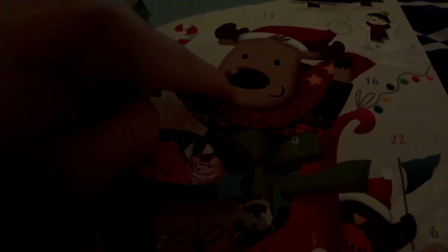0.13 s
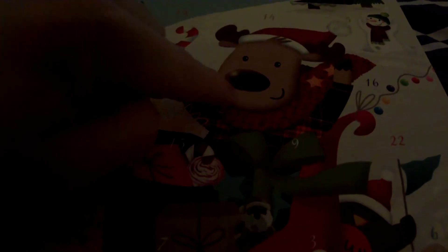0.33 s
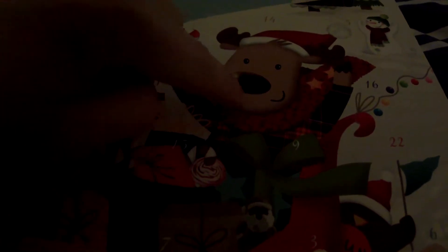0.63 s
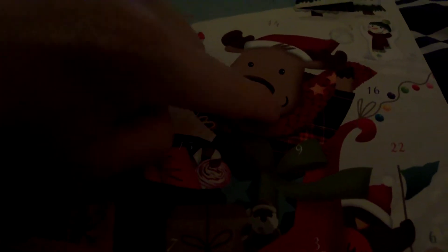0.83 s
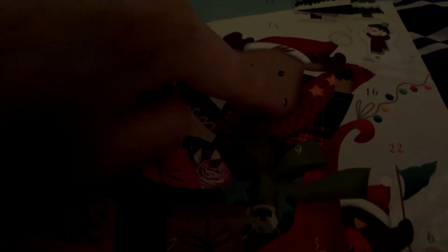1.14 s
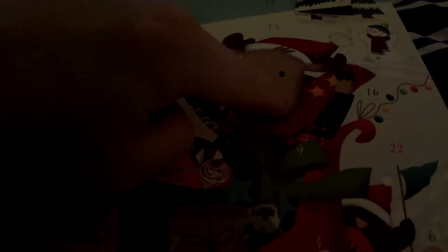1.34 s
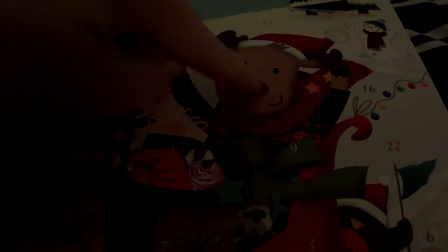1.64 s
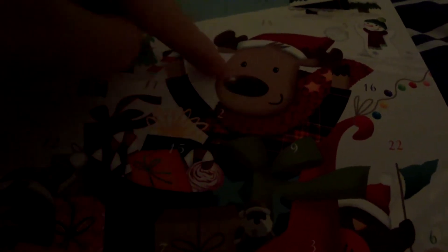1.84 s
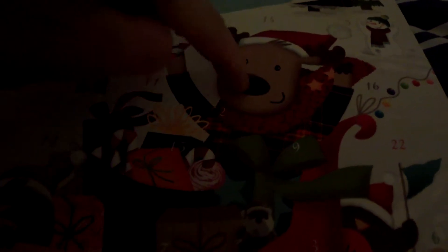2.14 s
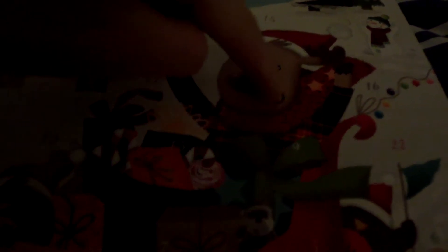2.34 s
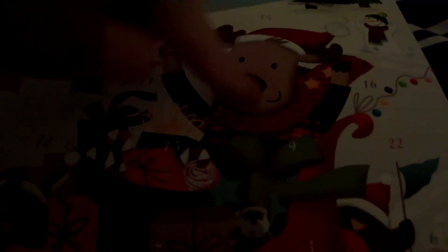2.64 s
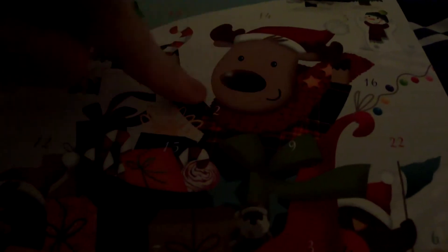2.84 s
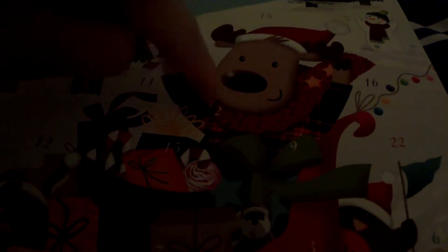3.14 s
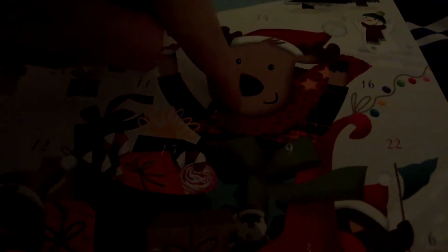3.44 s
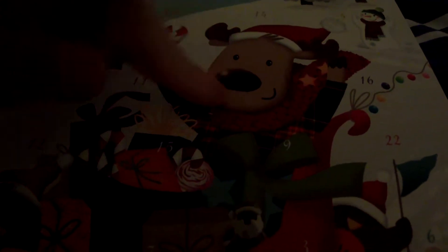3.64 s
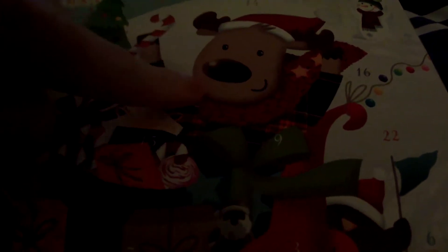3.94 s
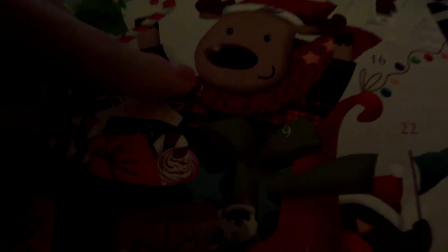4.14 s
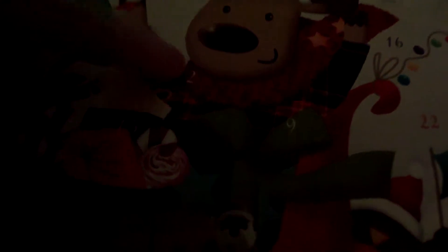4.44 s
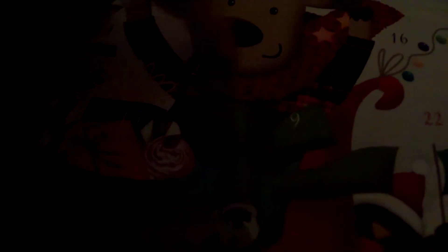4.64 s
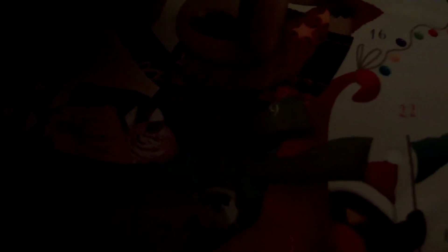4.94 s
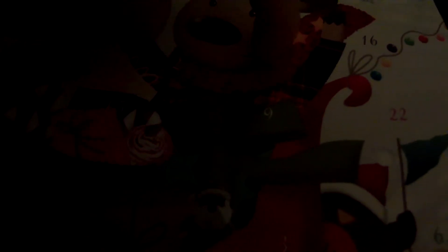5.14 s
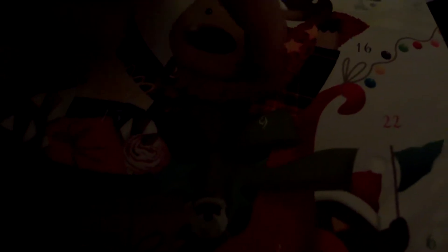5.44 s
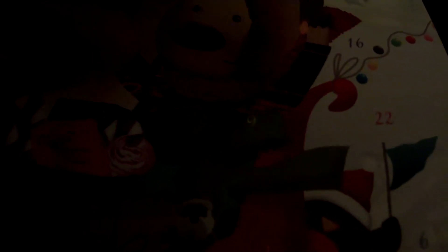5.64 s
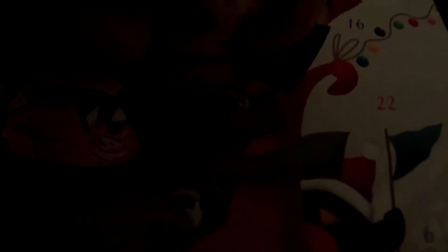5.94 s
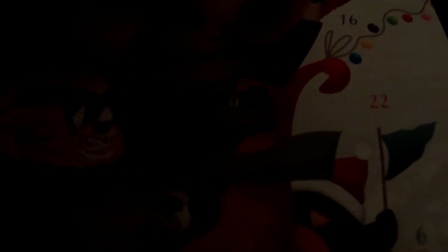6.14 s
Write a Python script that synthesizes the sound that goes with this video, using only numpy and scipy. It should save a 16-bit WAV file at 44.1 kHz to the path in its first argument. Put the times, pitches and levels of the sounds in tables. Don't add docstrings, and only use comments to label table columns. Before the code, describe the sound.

Very close to a hand-held camera microphone in a quiet room, fingernails feel along a cardboard edge with small dry clicks and rubbing. They pick at a flap, pressing the hollow box with soft low thumps, then tear it with several loud cracks. A quieter pause with faint ticks follows, then denser crinkling as the card is lifted and pulled back. Low rumble and hiss continue throughout.

```python
import sys
import numpy as np
from scipy import signal
from scipy.io import wavfile
from scipy.ndimage import uniform_filter1d

SR = 44100
rng = np.random.default_rng(int(sys.argv[2]) if len(sys.argv) > 2 else 0)


def volts(x):
    e = np.asarray(x, float) / 20
    return 10 ** e


def generate_wav(sig):
    pcm = np.round(np.clip(np.atleast_2d(sig).T, -1, 1) * 32767).astype(np.int16)
    wavfile.write(sys.argv[1], SR, pcm)


N = 276815
HZ = np.fft.rfftfreq(4096, 1 / SR)

# crest
# t/s, panel level/dB, crisp edge against panel/dB, fall by 8 dB/ms, ring f/Hz
BURSTS = [(0.0452, -41, -3.5, 3, 1800), (0.0576, -49.5, -1, 8, 1780), (0.0777, -47, 4.5, 8, 1980),
          (0.1052, -51, -5.5, 7, 1970), (0.1454, -50.5, 1, 15, 2730), (0.1744, -49, -7, 7, 760),
          (0.1993, -51, 8, 0, 3610), (0.2068, -37.5, -3, 0, 1210), (0.2218, -40, -1.5, 14, 1850),
          (0.2425, -44, 2, 4, 1750), (0.2612, -51, 8, 7, 3180), (0.273, -44.5, -6, 12, 1740),
          (0.2915, -38, -13.0, 2, 2020), (0.3206, -44, 8, 9.5, 2030), (0.3468, -45, -2, 18, 3610),
          (0.002, -43.5, -8, 3, 700), (0.3955, -44.0, -5.0, 3, 2770),
          (0.4385, -38.5, -10, 2.5, 1530), (0.4635, -43.5, -3, 3, 2530), (0.472, -44, -1, 6, 1680),
          (0.5552, -34, 0.5, 3, 2700), (0.5701, -42, -21, 3.5, 1450), (0.597, -48, -1, 6.5, 1270),
          (0.5495, -42.5, 0, 3, 1310), (0.6217, -50.5, 6, 2.5, 3340), (0.686, -47, -17, 3.5, 845),
          (0.7508, -58, -11, 5, 2000), (0.7694, -48, -13, 3, 2210), (0.7961, -47.5, 3, 8, 2780),
          (0.8102, -38.5, -18, 3, 1680), (0.8238, -38, -13, 1, 610), (0.8333, -53, 11.5, -4, 2060),
          (0.8489, -45, -9, 10.5, 1260), (0.8773, -42, -5, 2.5, 905), (0.9063, -37.5, 5, 5.5, 3150),
          (0.9254, -43.5, -5, 11, 1770), (0.9373, -45, -2, -7, 1670),
          (0.9516, -25.5, -12, 1.5, 1940), (0.9783, -43, -3, 1.5, 860),
          (0.998, -38, -8, 3.7, 2070), (1.012, -48, -11, 4, 1670), (1.02, -42, -2, 3.8, 1390),
                 (1.0487, -43, 0.5, 7.8, 2000), (1.0958, -37, -0.5, 10, 660), (1.119, -50, -13, 3.4, 2080),
                 (1.1282, -30, -5, 5.3, 2010), (1.168, -47, 0, 3.6, 2000), (1.176, -44, -3, 2.7, 2100),
                 (1.202, -45, 0.5, 2.6, 2100), (1.247, -43, 6.5, 2.8, 2730), (1.2807, -43, -8, 5.1, 680),
                 (1.289, -42.5, -2.5, 3.2, 600), (1.2964, -49, -5, 4.4, 3110), (1.37, -33, -5.5, 2.9, 2490),
                 (1.453, -35.5, -5, 4, 594), (1.4603, -37.5, 2, 4.2, 1730), (1.6573, -48.5, -23, 5.2, 2030),
                 (1.683, -45.5, 7.5, 3.5, 2040), (1.709, -36, 1, 6.2, 2220), (1.7625, -34, -0.5, 2.9, 3080),
                 (1.7773, -41, 1.5, 12, 1650), (1.83, -46.5, 0, 7.2, 2100), (1.879, -41, -2, 4.9, 2820),
                 (1.9137, -46.5, -2, 6.2, 1620), (1.9268, -44, 5.5, 6.9, 1800),
                 (1.9615, -52, -11, 8.3, 1950), (2.049, -47.5, 3, 13, 2940), (2.0863, -50, 8, 2.3, 1660),
                 (2.101, -48.5, 1, 11, 1770), (2.117, -45, -1, 5.1, 2060), (2.128, -36, -1, 6.2, 2100),
                 (2.145, -39.5, -4, 7.5, 2930), (2.18, -46, 0.5, 10.6, 2120), (2.247, -43.5, 2, 12, 2700),
                 (2.2878, -39.5, 0, 5.3, 2880), (2.301, -41, -19, 5.2, 800),
                 (2.317, -42.5, 4.5, 10.4, 1840), (2.344, -39, -3, 14.6, 2200),
          (2.3645, -36, 2, 7.2, 1840), (2.384, -40.5, -6, 4.6, 1760), (2.3974, -47, 0, 8.5, 2100),
                  (2.415, -50, 6, 5.5, 3120), (2.448, -48.5, -1, 19, 2090), (2.471, -50.5, 10, 2.5, 1750),
                  (2.4905, -38.5, -3, 5.2, 2100), (2.5808, -40, -4, 7.9, 2270),
                  (2.6512, -36.5, -4, 11, 1900), (2.683, -43.5, 4.5, 1.6, 2150),
                  (2.7085, -48.5, -16, 7.6, 920), (2.73, -37, 0, 3.3, 1580), (2.744, -50, -15, 12, 1050),
                  (2.7744, -45, -9.0, 5.9, 610), (2.807, -44, 0.5, 7, 2080), (2.827, -53, -5.0, 4.7, 1570),
                  (2.847, -49, 2, 3, 810), (2.858, -47.5, 4, 2.2, 845), (2.8674, -44, -4, 5.3, 3570),
                  (2.902, -40, -9, 4.5, 2060), (2.919, -42.5, -6, 6.5, 2060), (2.9828, -41.5, 0, 13, 3550),
                  (3.0157, -42, -16, 30, 2070), (3.0293, -53, -4, 12.3, 2130), (3.0478, -48, 1, 12, 2080),
                  (3.07, -38.5, 4.5, 7.2, 1950), (3.0862, -29, -2, 9.6, 1750), (3.108, -36.5, 3, 5.9, 2060),
                  (3.125, -39.5, -1.0, 9.4, 1800), (3.161, -45.5, 10, 4.3, 2020),
                  (3.1747, -41.5, 5.5, 13, 2040), (3.2022, -21.5, -3.5, 7.4, 2060),
                  (3.2279, -20, -7.5, 6.3, 2100), (3.2467, -29, -3, 8.5, 2060), (3.296, -52, -5, 17, 1610),
                  (3.3303, -46, -0.5, 3.3, 1590), (3.3762, -45, 3, 3.2, 2820),
                  (3.4248, -15.5, -2.5, 6.4, 1850), (3.514, -27.5, 0, 5.9, 650),
          (3.6847, -49, 3.5, 3.9, 1610), (3.7063, -49, -10.5, 3.8, 1740),
                  (3.7215, -48, -10, 5.4, 850), (3.7498, -45, -7, 7.6, 850), (3.8855, -40.5, 1.5, 2, 2900),
                  (3.903, -54, 1, 19, 640), (3.952, -45, -14, 3.3, 1600), (4.164, -51, -10, 6.2, 2130),
                  (4.363, -52, -17, 8, 810), (4.381, -57.5, 14.5, 2.1, 1800), (4.5231, -51, 12, 0.94, 2870),
                  (4.6142, -52.5, -4, 8.3, 1560), (4.6936, -34, -12, 2, 1660), (4.779, -51, -3, 8.8, 1590),
                  (4.8025, -43, 2, 4.9, 2740), (4.8226, -42, 3, 2.1, 2790), (4.8471, -36, -1, 2.7, 3650),
                  (4.864, -41, -6, 2.7, 2690), (4.881, -49.0, 1, 6.8, 1600), (4.95, -54, 12, 3, 4200),
                  (4.967, -46, 0.5, 5.7, 1930), (5.0112, -41.5, -20, 2.1, 880), (5.0348, -35, -7, 3, 1660),
                  (5.049, -51, 4, 5.1, 1570), (5.063, -39.5, -1.5, 4.6, 2760),
                  (5.0724, -44.5, -10, 4.1, 3180), (5.0812, -53, 2, 5.7, 1710), (5.1019, -35, 1, 3.2, 1580),
                  (5.1206, -41, -9, 2.2, 2210), (5.1339, -33.5, -2.0, 2, 3270),
                  (5.147, -44.5, 4, 3.5, 3020), (5.193, -40.5, -3.5, 4.3, 1570),
                  (5.219, -52, -3, 4.3, 1650), (5.235, -40.5, -6.5, 3, 1700), (5.3734, -47.5, -8, 5, 1320),
                  (5.398, -37, -10, 1.7, 2780), (5.4144, -52.5, 14, 9.4, 3660), (5.4353, -40, 3, 7.8, 1810),
                  (5.4468, -35.5, -5, 7.3, 2820),
          (5.4715, -37.5, 2, 2.2, 3000), (5.4788, -35, 5, 2.1, 1570),
                  (5.4907, -35, -3.5, 12.5, 3970), (5.527, -45.5, 3, 8, 2080), (5.534, -43, -4, 9.1, 1590),
                  (5.5636, -36, -2, 4.9, 1700), (5.582, -37, 1, 2.3, 2180), (5.5965, -34, -0.5, 2.1, 1590),
                  (5.6163, -48, 1, 2.9, 2130), (5.626, -37, -7.0, 3.3, 1630),
                  (5.637, -34.5, -19, 1.6, 2850), (5.6511, -35.5, -2, 2.8, 3760),
                  (5.66, -36.5, -1, 5.4, 3700), (5.6818, -46.5, 0, 7.7, 2710),
                  (5.7996, -44.5, 4.5, 11.3, 1730), (5.8247, -43, 6, 5.7, 3220), (5.85, -44, -3, 6.1, 2060),
                  (5.8582, -38, -10, 3.7, 1540), (5.8688, -50, -3.5, 3.9, 1580),
                  (5.8888, -41.5, 1, 2.7, 2050), (5.909, -37.5, -2, 3.9, 2060),
                  (5.9257, -37, -3, 5.8, 2360), (5.9405, -38, -1, 6, 3520), (5.957, -42.5, -3, 11, 1670),
                  (5.967, -41, 2, 5.7, 2220), (5.9807, -34, 2, 1.6, 2210), (5.9937, -30, -6, 1.6, 1940),
                  (6.005, -37, 3.5, 4.1, 2090), (6.0265, -54, -3.5, 3.1, 1690), (6.043, -42, -13, 2, 1580),
                  (6.056, -45.5, -10, 5.3, 2200), (6.0702, -26, -3, 4.3, 1770),
                  (6.128, -39.5, -9.0, 3.5, 1700), (6.135, -35.5, -3.5, 3.3, 2070),
                  (6.1719, -34, 1.5, 3.5, 2920), (6.224, -37.5, -1, 6.9, 1910),
                  (6.2402, -58, -0.5, 8.5, 1730), (6.25, -39, -6, 6.6, 850), (6.2727, -39.5, 2, 2.9, 2110),
          (3.5077, -24, -3, 2.5, 1800),
    (4.017, -59, 4, 3, 2900),
    (4.1455, -61, 7, 3, 3560),
]
RISE_MS, RISE_PER_FALL = 1.13, 0.27
CRACK_DB, CRACK_PACE = -22, 0.4

# start t/s, length/s, pressure level/dB, fine scrape against it/dB
STROKES = [(0.027, 0.095, -52, -7), (0.17, 0.19, -51.5, -6), (0.37, 0.11, -50, -9), (0.58, 0.044, -63, -4),
           (0.669, 0.018, -51, -20), (0.736, 0.026, -51, -16), (0.78, 0.084, -54.5, -9),
           (1.407, 0.011, -49, 1), (0.883, 0.13, -47, -0.5), (1.045, 0.24, -52.5, -4),
           (1.643, 0.15, -47.5, -13), (1.785, 0.23, -55.5, -1.5), (2.086, 0.14, -53.5, -4),
           (2.226, 0.31, -54, 2.5), (2.55, 0.22, -62, 2), (2.81, 0.22, -51, -9), (2.977, 0.22, -53, 8),
           (3.16, 0.13, -39.5, -8), (3.414, 0.15, -44.5, 0.5), (3.651, 0.079, -53, -18),
           (3.883, 0.14, -54, -12), (4.168, 0.071, -56.5, 4.5), (4.232, 0.19, -54.5, -5),
           (4.52, 0.35, -59.5, 8), (4.638, 0.14, -65.5, 14), (5.018, 0.13, -49.5, -9),
           (5.188, 0.073, -52.5, -1), (5.372, 0.18, -50.5, -10), (5.544, 0.19, -67, 10),
           (5.78, 0.16, -55, -10), (5.89, 0.16, -46.5, -17), (6.19, .1, -52, -8)]
LAND_S, LEAVE_S = 0.012, 0.005
EASE = 0.079
RESTING_DB, RESTING_FINE_DB = -61.5, -63.5
SAG_DB = -3

# deepest point t/s, level/dB, width/ms
PUSHES = [(0.07, -27.5, 2.8), (0.1755, -32.5, 3.9), (0.549, -35, 3.7), (0.754, -22, 5.1),
          (0.794, -20.5, 4.9), (0.8233, -23.5, 3.7), (0.849, -23, 1.3), (0.952, -28, 0.99),
          (1.106, -32, 2.8), (1.115, -26, 2.7), (1.1267, -25, 3.4), (1.139, -29, 1.9), (1.159, -31, 2.2),
          (1.178, -28, 1.9), (1.191, -27, 2.3), (1.2, -29, 3.9), (1.217, -29, 4.4), (1.2495, -28, 3.2),
          (1.2824, -17.5, 3.2), (1.4514, -15.5, 2.4), (2.299, -20, 3.4), (3.2885, -24, 13.2),
          (3.4236, -30, 2.4), (3.506, -27, 3.5), (4.672, -29.5, 6.4), (5.2313, -28.5, 7.9),
          (5.8202, -26.5, 0.7), (6.067, -15.5, 1.8)]
# crest t/s, level/dB, width/ms
SLIPS = [
    (3.916, -46, 1.4),
    (3.938, -41, 1.6),
    (3.959, -38, 1.2),
    (3.976, -37, 1.6),
    (3.995, -36.5, 1.9),
    (4.345, -35.5, 0.9),
    (4.36, -31.5, 0.65),
]
# t/s, level/dB, ring f/Hz, fall by 8 dB/ms
KNOCKS = [(0.433, -49.5, 795, 6.5), (5.228, -36, 625, 2), (2.855, -41, 834, 2.5), (2.91, -49, 276, 7),
          (2.976, -42.5, 290, 5), (3.083, -34, 960, 2.5), (3.2, -34.5, 1010, 9), (3.227, -29.5, 1114, 10),
          (3.231, -39, 307, 18), (3.366, -45.5, 834, 5.5), (3.421, -28.5, 320, 1.5), (3.508, -25, 635, 7),
          (3.749, -50, 270, 13), (3.284, -41, 263, 4), (5.097, -54, 620, 8), (3.204, -39, 290, 10),
          (3.422, -39, 940, 1), (5.988, -30, 910, 2), (6.245, -38, 835, 0.5)]

# f/Hz, width/Hz, lift/dB
BOX_MODES = [(620, 165, 4), (880, 50, 4.5), (2820, 900, 6), (3560, 610, 1)]
# f/Hz, level/dB per Hz
CARD_COLOUR = [(250, -0.5), (600, -5), (1300, -4.5), (2200, -6), (4400, -10), (6400, -4.5), (8000, -4),
               (15000, -24.5)]
# low f/Hz, high f/Hz
PANEL_AND_EDGE = [(300, 4700), (4200, 20000)]

# f/Hz, level/dB per Hz
RUMBLE_COLOUR = [(12, 2.5), (40, 4.5), (54, -8.5), (125, -8), (175, -20.5), (300, -20), (700, -34),
                 (1100, -68.5)]
TREMOR_DB = -47.5
# f/Hz, level/dB per Hz
HISS_COLOUR = [(300, -41), (760, 5.5), (1400, -2.5), (2200, -7), (4800, -2.5), (9760, -2.5), (14500, 3.5),
               (15500, -12)]
HISS_DB = -62.5
# f/Hz, width/Hz, lift/dB
MIC_BANDS = [(3270, 1100, 15), (4380, 290, 11.5), (6120, 550, 10.5)]
# f/Hz, level/dB
WHINE = [(14426, -84)]
# f/Hz, width/Hz, lift/dB
CASE_MODES = [(398, 130, -17.5), (1449, 74, -7), (1570, 37, 4), (1700, 145, 6), (1845, 77, -6.5),
              (2060, 103, 5), (2642, 50, -10.5), (7300, 140, 0), (7280, 230, 2.5), (7580, 200, -7),
              (8360, 310, -5), (9050, 270, 7)]


def evened(x):
    return x / np.sqrt(np.mean(x ** 2) + 1e-20)


def lumps(first, second):
    smooth = uniform_filter1d(rng.standard_normal(N), size=first)
    return evened(uniform_filter1d(smooth, size=second))


def read(points, hz):
    f, value = np.transpose(points)
    return np.interp(np.log(hz + 1), np.log(f + 1), value)


def lifts(bands):
    return sum(db / (1 + (2 * (HZ - hz) / width) ** 2) for hz, width, db in bands)


def add(mix, s, sound):
    part = mix[max(round(s * SR), 0):][:len(sound)]
    part += sound[:len(part)]


def coloured(x, gain):
    log = np.log(np.maximum(gain / gain.max(), 1e-5))
    full = np.r_[log, log[-2:0:-1]]
    taps = np.fft.ifft(np.exp(np.conj(signal.hilbert(full)))).real
    return signal.oaconvolve(x, taps / np.linalg.norm(taps))[:N]


def microphone():
    port_db = -7.94 / (1 + (8780.0 / (HZ + 1)) ** 40)
    return volts(lifts(CASE_MODES) + port_db)


def camera():
    t = np.arange(N) / SR
    colour = volts(read(HISS_COLOUR, HZ) + lifts(MIC_BANDS)) * microphone()
    hiss = volts(HISS_DB) * coloured(rng.standard_normal(N), colour)
    return hiss + sum(np.sqrt(2) * volts(db) * np.sin(2 * np.pi * hz * t) for hz, db in WHINE)


def rumble(shoves):
    shake = rng.standard_normal(N) * volts(TREMOR_DB + 3.2 * lumps(2000, 1500))
    after = signal.lfilter([.0012], [1, -.9988], abs(shoves))
    low_band = signal.butter(2, [45., 220.], "band", fs=SR)
    rough = evened(signal.lfilter(*low_band, rng.standard_normal(N)))
    return coloured(shake, volts(read(RUMBLE_COLOUR, HZ))) + volts(-6.5) * after * rough


def box_band(lo, hi, ring):
    edges = 1 / np.sqrt((1 + (lo / (HZ + 1)) ** 8) * (1 + (HZ / hi) ** 8))
    return volts(read(CARD_COLOUR, HZ) + ring * lifts(BOX_MODES)) * edges * microphone()


def fibres(per_s, spread_db, smooth):
    breaks = rng.random(N) < per_s / SR
    size = volts(spread_db * np.minimum(rng.exponential(1, N), 4)) * breaks
    decay = np.exp(-1000 / (SR * 0.55))
    spits = np.sqrt(signal.lfilter([1], [1, -decay], size ** 2))
    return evened(evened(spits * rng.standard_normal(N)) + smooth * rng.standard_normal(N))


def ringing(x, hz, width_hz, share):
    ring = signal.lfilter(*signal.iirpeak(hz, hz / width_hz, fs=SR), x)
    return evened((1 - share) * evened(x) + share * evened(ring)) * np.sqrt(np.mean(x ** 2))


def snaps():
    ms = np.arange(-1000, 3000) / SR * 1000
    buses = np.zeros((2, N + 4000))
    low, high = [np.pad(fibres(per_s=9000., spread_db=3.5, smooth=0.38), (1000, 3000))
                 for _ in PANEL_AND_EDGE]
    bursts = BURSTS
    for (s, db, crisp_db, fall_ms, ring_hz), edge_at in zip(bursts, rng.random(len(bursts))):
        pace = CRACK_PACE if db > CRACK_DB else 1
        rise_ms = max(pace * (RISE_MS + RISE_PER_FALL * fall_ms), .5)
        swell_db = -8 * (np.minimum(ms, 0) / rise_ms) ** 2
        shape = volts(swell_db - 8 * np.maximum(ms, 0) / max(fall_ms, 1))
        here = slice(round(s * SR), round(s * SR) + len(ms))
        panel = low[here] * shape
        edge = (0.39 * low[here] + 0.41 * high[here]) * shape
        panel = ringing(panel, ring_hz, width_hz=290.0, share=0.29)
        edge = ringing(edge, 5800 + 2500 * edge_at, width_hz=910.0, share=0.13)
        add(buses[0], s, volts(db - 3.5) * panel)
        add(buses[1], s, volts(db + crisp_db + 2.5) * edge)
    return sum(coloured(bus[1000:], box_band(*band, ring=0.78))
               for bus, band in zip(buses, PANEL_AND_EDGE))


def contact():
    t = np.arange(N) / SR
    power = volts([[RESTING_DB], [RESTING_FINE_DB]]) ** 2
    for start, length, db, fine_db in STROKES:
        landing = (t - start) / (LAND_S + EASE * length)
        leaving = (start + length - t) / (LEAVE_S + EASE * length) + 1
        held = np.clip(np.minimum(landing, leaving), 0, 1)
        sag_db = SAG_DB * np.clip((t - start) / length, 0, 2)
        power = power + (held * volts(np.array([[db], [db + fine_db]]) + sag_db)) ** 2
    return 10 * np.log10(power)


def rustle():
    panel_db, scrape_db = contact()
    firm = np.clip((panel_db + 58) / 8., .15, 1)
    out = 0
    for level_db, band, ring in zip((panel_db, scrape_db), PANEL_AND_EDGE, (.9, .7)):
        level = volts(level_db - 3.0 + 3.6 * firm * lumps(200, 120))
        drive = fibres(per_s=3400.0, spread_db=5.0, smooth=0.76) * level
        out = out + coloured(drive, box_band(*band, ring))
    return out


def pushes():
    t = np.arange(4000) / SR
    inward, jerks = np.zeros((2, N))
    for bus, table in ((inward, PUSHES), (jerks, SLIPS)):
        for s, db, width_ms in table:
            u = t / (0.00039 * width_ms)
            add(bus, s - 0.000574 * width_ms, volts(db - 3.0) * (u * np.exp(1 - u)) ** 0.93)
    shudder = signal.lfilter(*signal.iirpeak(280., 2.5, fs=SR), jerks)
    low_cut = signal.butter(2, 28., "high", fs=SR)
    out = signal.lfilter(*low_cut, jerks + 2.3 * shudder - inward)
    wobble = signal.lfilter(*signal.butter(1, [45., 110.], "band", fs=SR), out)
    return out + 0.1 * wobble


def knocks():
    ms = np.arange(3000) / SR * 1000
    out = np.zeros(N)
    for s, db, hz, fall_ms in KNOCKS:
        shape = (1 - np.exp(-(ms / 2.07) ** 2)) * volts(-8 * ms / max(fall_ms, 2))
        wide_band = signal.butter(2, [0.86 * hz, 3.0 * hz], "band", fs=SR)
        rub = evened(signal.lfilter(*wide_band, rng.standard_normal(len(ms))))
        tone = np.sqrt(2) * np.sin(2 * np.pi * hz * ms / 1000)
        add(out, s, volts(db + 10.0) * shape * (0.45 * tone + 0.48 * rub))
    return out


def boxed(x):
    t = np.arange(9000) / SR
    decay = volts(-60 * t / 0.25)
    tail = rng.standard_normal(len(t)) * decay * (1 - np.exp(-t / 0.0024))
    return x + volts(-13.5) * signal.oaconvolve(x, tail / np.linalg.norm(tail))[:N]


def scene():
    shoves = pushes()
    mix = boxed(snaps() + knocks()) + rustle() + shoves + rumble(shoves) + camera()
    return mix[None] + .001


def top_cut(x):
    return signal.sosfilt(signal.butter(12, 15400, fs=SR, output="sos"), x)


def record(dry):
    band = signal.firwin2(401, [0, 14950, 15150, SR / 2], [1, 1, .05, .03], fs=SR)
    mix = signal.oaconvolve(dry, band[None], "same")
    return top_cut(mix)


dry = scene()
out = record(dry)
generate_wav(out)
```